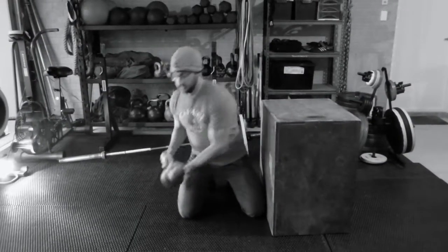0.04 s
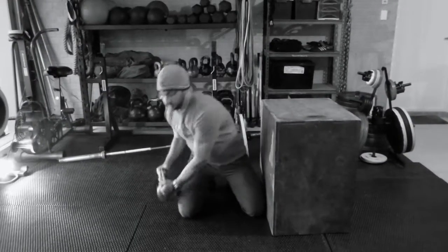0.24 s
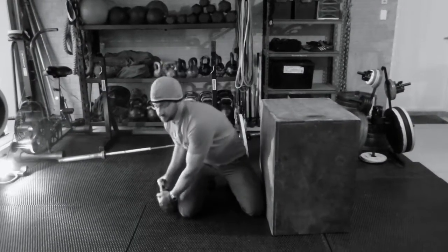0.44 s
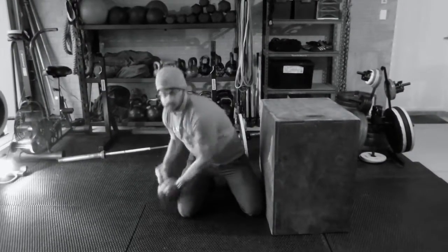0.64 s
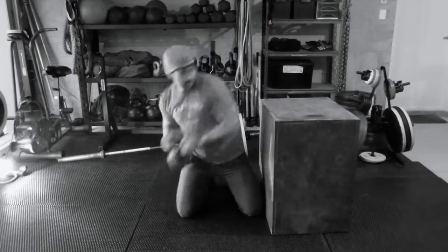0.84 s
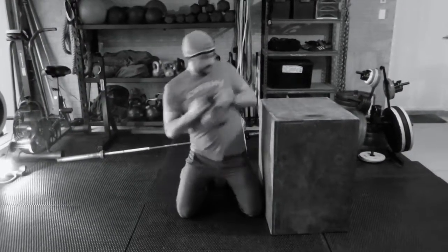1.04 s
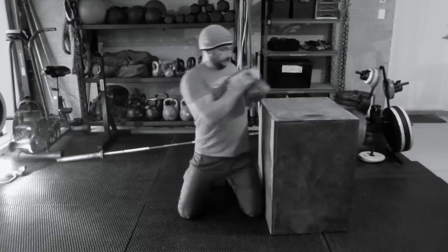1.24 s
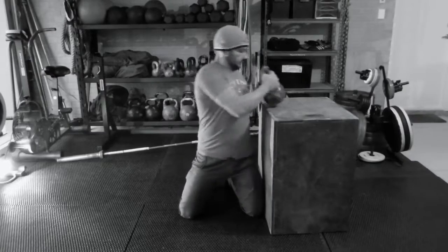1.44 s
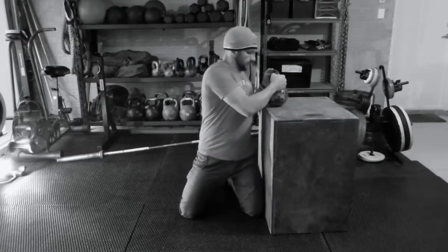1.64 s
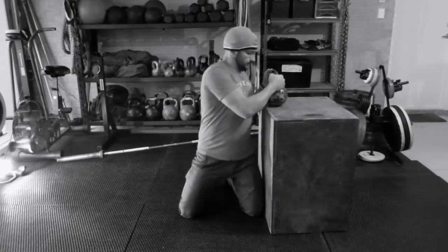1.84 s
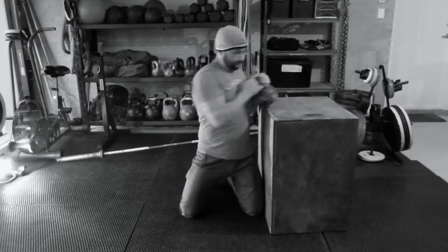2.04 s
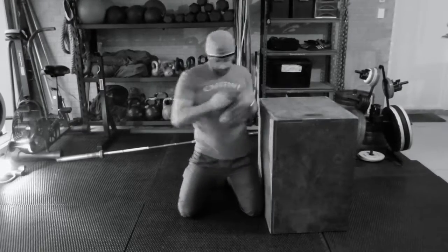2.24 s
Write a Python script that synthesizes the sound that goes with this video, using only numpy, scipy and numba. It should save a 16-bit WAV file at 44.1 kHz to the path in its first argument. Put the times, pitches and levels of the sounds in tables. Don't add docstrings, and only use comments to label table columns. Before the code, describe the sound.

A heavy iron weight thuds onto a hollow plywood box, clattering briefly then booming. Before it comes a short dull tap on rubber flooring and cloth swishes; after it, a short rough drag. Reverberant garage gym, camera microphone.

```python
import sys
import numpy as np
from scipy import signal
from scipy.fft import rfft, irfft
from scipy.io import wavfile
from scipy.ndimage import uniform_filter1d
from numba import njit

SR = 44100
rng = np.random.default_rng(int(sys.argv[2]) if len(sys.argv) > 2 else 0)


def gain_from_decibels(decibels):
    exponent = np.asarray(decibels, float) / 20
    return 10 ** exponent


def generate_wav(sig):
    pcm = np.round(np.clip(np.atleast_2d(sig).T, -1, 1) * 32767).astype(np.int16)
    wavfile.write(sys.argv[1], SR, pcm)


N = 101297

# (frequency [Hz], level per Hz [dB])
AIR_SPECTRUM = [(15, -65), (25, -28), (139, -2.5), (258, 3), (329, -0.5), (864, -1), (3580, -12.5),
                (15300, -32)]
# (frequency [Hz], level per Hz [dB])
CLOTH_SPECTRUM = [(410, -43.5), (700, -17), (1060, -26), (1170, -9.5), (3990, 0), (4430, -3),
                  (15300, -11.5)]
# (peak time [s], level [dB], rise [s], fall [s], brightness [dB per octave])
SWISHES = [
    (.4, -49.5, 0.09, 0.11, 1.5),
    (0.489, -40.5, 0.044, 0.041, 1),
    (.665, -47, 0.031, 0.053, 5),
    (.742, -32, .04, .025, -2.5),
    (.775, -47, .02, .025, 3),
    (0.899, -50, 0.09, 0.17, -13.5),
    (1.1, -51.5, 0.11, 0.18, 1.5),
    (2.06, -54.5, 0.016, .05, 2.5),
    (2.28, -46.5, 0.061, 0.013, -5),
]
# (frequency [Hz], side level [dB])
NOISE_WIDTH = [(30, -16), (100, -31), (400, -14), (1000, -7), (8000, -7)]
# (frequency [Hz], time to fall 60 dB [s])
ROOM_DECAY = [(100, 1.23), (400, 0.54), (800, 0.5558), (3000, 0.5349)]
# (frequency [Hz], side level [dB])
ROOM_WIDTH = [(30, -13), (100, -39), (400, -45), (1000, -13), (4000, -1.5)]
# (frequency [Hz], level per Hz [dB])
SCRAPE_SPECTRUM = [(530, -46), (900, 4), (1240, -7.5), (1330, -2), (3120, -4.5), (15300, -33.5)]
# (time [s], level [dB])
DRAG_LEVEL = [
    (2.075, -60),
    (2.087, -29),
    (2.108, -22),
    (2.165, -21),
    (2.185, -28),
    (2.225, -36),
    (2.29, -50),
]
# (frequency [Hz], level [dB], time to fall 60 dB [s])
LOADED_BOX_MODES = [(103, -8, 0.036), (139, -4, 0.047), (181.8, -1, 0.037), (259, 1, 0.024),
                    (359, -6, 0.029), (480, -18.5, 0.025), (676, -14.5, 0.034)]
# (time [s], level [dB])
TAPS = [
    (0.5026, -9),
    (.5115, -15.5),
    (.5185, -14.5),
    (.5295, -18),
    (.5375, -18.5),
    (.5495, -39),
]
# (frequency [Hz], level [dB], time to fall 60 dB [s])
TAP_MODES = [(286, -10.5, 0.037), (397, -2.5, 0.025), (506, -3.5, 0.0067), (585, -4.5, .015),
             (698, 8, 0.01), (876, 4, 0.007)]
# (time [s], box level [dB], plate level [dB], click level [dB])
LANDING = [
    (1.538, -29, -17.5, -21),
    (1.5425, -28, -13.5, -17),
    (1.545, -43, -12, -13),
    (1.547, -7, -3.5, -34),
]
# (frequency [Hz], level [dB], time to fall 60 dB [s])
BOX_MODES = [(123, -19, 1.0), (135, -7, .44), (161, 0, .6), (169, -10, 1.4), (183, -10, .5), (246, -11, .9),
             (257, -2, .42), (265.5, 0, .8), (272, -13, 1.6), (311, -1, .3), (349, -10, .65),
             (358, -1, .18), (401, -6, .5), (407, -13, 1.1)]
# (frequency [Hz], level [dB], time to fall 60 dB [s])
PLATE_MODES = [(290, -6, .05), (335, 5, .035), (380, -6, .15), (480, -9, .04), (580, -5, .04),
               (736, -11, .15), (830, -6, .03), (1050, -9, .02)]
# (frequency [Hz], level [dB], time to fall 60 dB [s])
CLICK_MODES = [(1264, 0, 0.018), (1754, 0.5, 0.014), (2096, -4, 0.0064), (2630, -10.5, 0.007),
               (3400, -14.5, 0.021), (4440, -16.5, 0.0071), (6530, -23, .004)]

AIR_DB = -39.5
CREAK_S, CREAK_HZ, CREAK_DB, CREAK_LEN_S = 0.14, 179.4, -41, 0.056
DRAG_PER_S, DRAG_JITTER, DRAG_SCATTER_DB, DRAG_HISS_DB = 110, 0.34, 5.5, -15.5
TAP_PUSH_MS = 0.73
FLOOR_PUSH_MS, FLOOR_HZ, FLOOR_DB, FLOOR_T60_S = 16, 79, -35, 0.65
BOX_PUSH_MS, PLATE_PUSH_MS, CLICK_PUSH_MS = 1.44, 0.8, 0.068
SETTLE_S, SETTLE_DB_PER_S = 1.786, 37
FIRST_ECHO_S = 0.0022
BOX_ROOM_DB, PLATE_ROOM_DB, TAP_ROOM_DB, CLICK_ROOM_DB = -17, -3, -4, -12
GAIN_TOP_DB, GAIN_RATIO, GAIN_ATTACK_S, GAIN_RELEASE_S = -30, 1.72, 0.023, 0.16
FAR_HIGHPASS_HZ, LEFT_DB = 85, 0.7
MIC_DIP_HZ, MIC_DIP_WIDTH_HZ, MIC_DIP_DB, MIC_TOP_DB = 7960, 650, -3.5, -8.5
CEILING = 1.8


def table(hz, rows):
    rows = np.array(rows)
    return np.interp(np.log(np.maximum(hz, 1)), np.log(rows[:, 0]), rows[:, 1])


def unit(x):
    return x / np.sqrt(np.mean(x ** 2))


def colour(x, db):
    n = x.shape[-1]
    return irfft(rfft(x) * gain_from_decibels(db(np.fft.rfftfreq(n, 1 / SR))), n)


def pair(spectrum, grain_db=0):
    mid, side = rng.standard_normal((2, N)) * gain_from_decibels(grain_db * rng.exponential(size=N))
    mid = colour(mid, lambda f: table(f, spectrum))
    side = colour(side, lambda f: table(f, spectrum) + table(f, NOISE_WIDTH))
    return np.array([mid + side, mid - side]) / np.sqrt(np.mean(mid ** 2))


def walk(rate):
    k = int(SR / rate)
    smooth = uniform_filter1d(rng.standard_normal(N), k)
    return unit(uniform_filter1d(smooth, k))


def push(at_s, db, ms):
    x = (np.arange(N) / SR - at_s) / (ms / 1000)
    shape = np.where((x > 0) & (x < 1), np.sin(np.pi * x) ** 2, 0)
    return gain_from_decibels(db) * shape * 2000 / (ms * SR)


def ring(force, modes):
    t = np.arange(SR) / SR
    body = 0
    for k, (hz, db, t60) in enumerate(modes):
        fade = np.exp(-np.log(1000) * t / t60)
        body = body + (-1) ** k * gain_from_decibels(db) * np.sin(2 * np.pi * hz * t) * fade
    return signal.fftconvolve(force, body)[:N]


def air():
    t = np.arange(N) / SR
    swell = np.exp(-((t - CREAK_S) / CREAK_LEN_S) ** 2)
    creak = gain_from_decibels(CREAK_DB) * np.sin(2 * np.pi * CREAK_HZ * t) * swell
    return gain_from_decibels(AIR_DB + 0.28 * walk(1)) * pair(AIR_SPECTRUM) + creak


def clothes():
    t = np.arange(N) / SR
    rub = gain_from_decibels(0.72 * walk(20)) * pair(CLOTH_SPECTRUM, grain_db=1.63)
    out = 0
    for s, db, rise, fall, tilt_db in SWISHES:
        distance = np.abs(t - s) / np.where(t < s, rise, fall)
        env = gain_from_decibels(db) * np.exp(-distance ** 0.97)
        out = out + env * colour(rub, lambda f: tilt_db * np.log2(np.maximum(f, 500) / 4000))
    return out


def room(x):
    t = np.arange(SR) / SR
    tail = 0
    for hz in 60 * 2. ** np.arange(8):
        noise = rng.standard_normal((2, SR)) * [[1], [gain_from_decibels(table(hz, ROOM_WIDTH))]]
        band = colour(noise, lambda f: -12 * np.log2(np.maximum(f, 1) / hz) ** 2)
        tail = tail + band * np.exp(-np.log(1000) * t / table(hz, ROOM_DECAY))
    mid, side = tail * np.clip(t / FIRST_ECHO_S - 1, 0, 1)
    tail = np.array([mid + side, mid - side]) / np.sqrt(np.sum(mid ** 2))
    return signal.fftconvolve(x[None], tail, axes=1)[:, :N]


@njit
def follow(x, up, down):
    e, out = 0., np.empty(len(x))
    for i in range(len(x)):
        e += (abs(x[i]) - e) * (up if abs(x[i]) > e else down)
        out[i] = e
    return out


def duck(loud):
    e = follow(loud, 1 / (GAIN_ATTACK_S * SR), 1 / (GAIN_RELEASE_S * SR))
    return np.minimum(gain_from_decibels(GAIN_TOP_DB) / (e + 1e-9), 1) ** (1 - 1 / GAIN_RATIO)


def drag():
    rows = np.array(DRAG_LEVEL)
    env = gain_from_decibels(np.interp(np.arange(N) / SR, rows[:, 0], rows[:, 1], left=-120))
    slip_rate = DRAG_PER_S * np.exp(DRAG_JITTER * walk(100))
    slips = np.diff(np.floor(np.cumsum(slip_rate / SR)), prepend=0)
    jolts = slips * gain_from_decibels(DRAG_SCATTER_DB * rng.standard_normal(N))
    scale = np.std(ring(jolts, LOADED_BOX_MODES))
    hiss = env * gain_from_decibels(DRAG_HISS_DB) * pair(SCRAPE_SPECTRUM, grain_db=2.0)
    return ring(env * jolts, LOADED_BOX_MODES) / scale, hiss


def floor_thump():
    return ring(push(TAPS[0][0], FLOOR_DB, FLOOR_PUSH_MS), [(FLOOR_HZ, 0, FLOOR_T60_S)])


def tap():
    return ring(sum(push(s, db, TAP_PUSH_MS) for s, db in TAPS), TAP_MODES)


def landing():
    def force(column, ms):
        return sum(push(row[0], row[column], ms) for row in LANDING)

    damping = gain_from_decibels(-SETTLE_DB_PER_S * np.maximum(np.arange(N) / SR - SETTLE_S, 0))
    boom = ring(force(1, BOX_PUSH_MS), BOX_MODES) * damping
    plate = ring(force(2, PLATE_PUSH_MS), PLATE_MODES)
    click = ring(force(3, CLICK_PUSH_MS), CLICK_MODES)
    return boom, plate, click


def scene():
    jolts, hiss = drag()
    boom, plate, click = landing()
    far = signal.butter(4, FAR_HIGHPASS_HZ, "high", fs=SR, output="sos")
    box, plate, knock = signal.sosfilt(far, [boom + jolts, plate, tap()])
    to_room = gain_from_decibels(CLICK_ROOM_DB) * click + gain_from_decibels(BOX_ROOM_DB) * box
    to_room = to_room + gain_from_decibels(PLATE_ROOM_DB) * plate + gain_from_decibels(TAP_ROOM_DB) * knock
    hits = box + plate + click + knock + floor_thump() + room(to_room)
    back = hiss + (clothes() + air()) * duck(hits.mean(axis=0))
    return hits + back * gain_from_decibels(np.array([[LEFT_DB], [-LEFT_DB]]))


def low_pass(x):
    return signal.sosfilt(signal.butter(12, 15420, fs=SR, output="sos"), x)


def record(dry):
    def microphone_db(f):
        dip = MIC_DIP_DB * np.exp(-((f - MIC_DIP_HZ) / MIC_DIP_WIDTH_HZ) ** 2)
        return dip + MIC_TOP_DB * np.clip(f / 3000 - 4, 0, 2) ** 2

    heard = colour(dry, microphone_db)
    mix = np.clip(CEILING * np.tanh(heard / CEILING), -1, 1)
    return low_pass(mix)


dry = scene()
out = record(dry)
generate_wav(out)
```